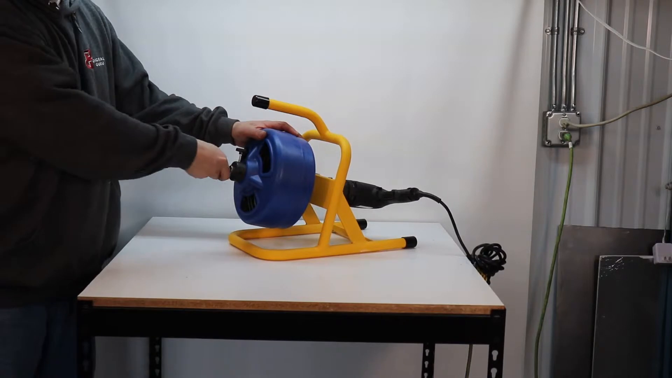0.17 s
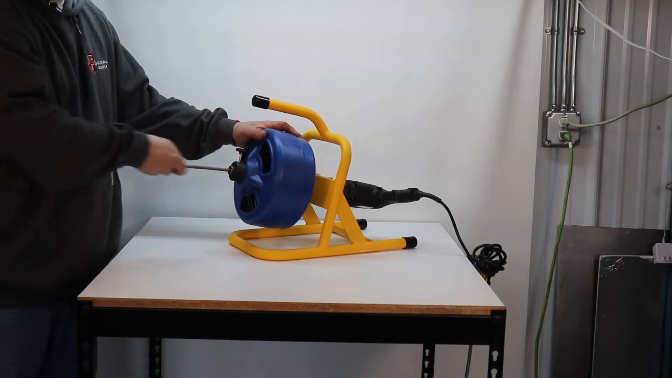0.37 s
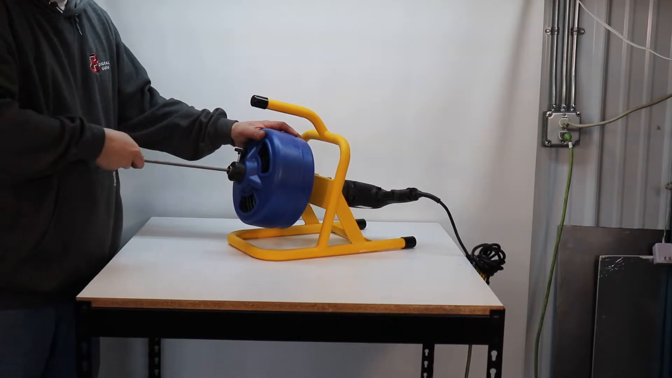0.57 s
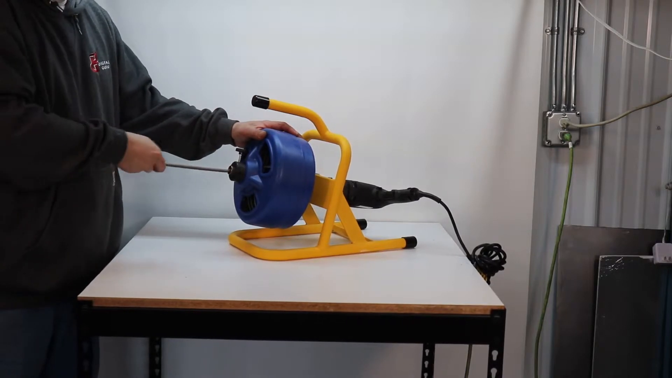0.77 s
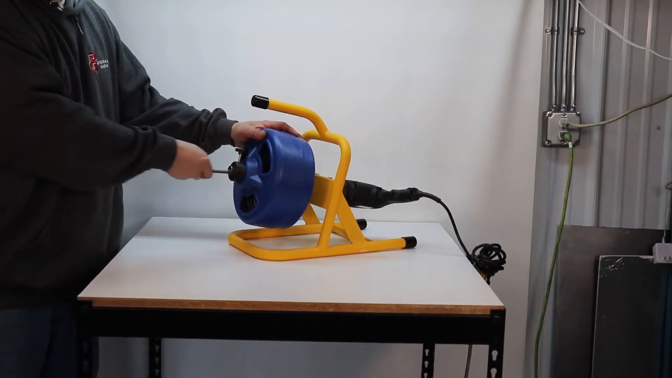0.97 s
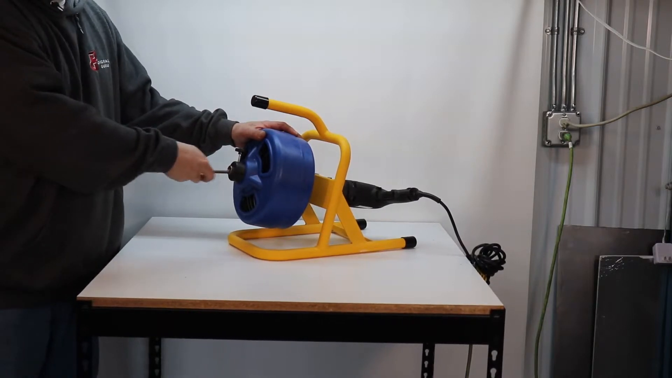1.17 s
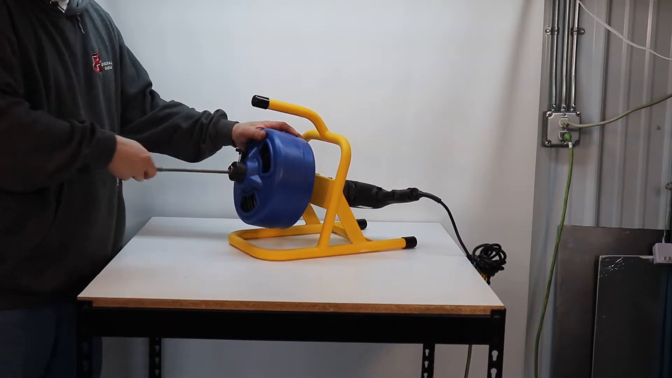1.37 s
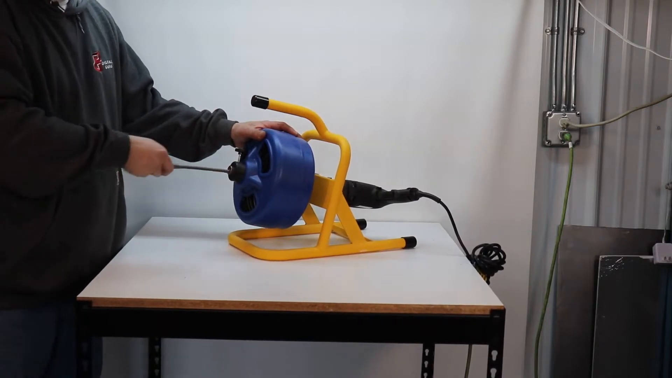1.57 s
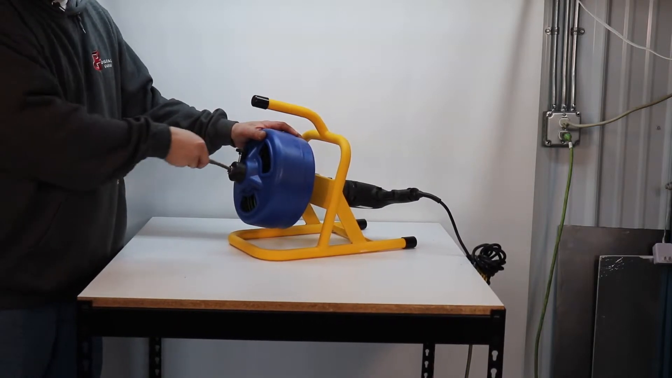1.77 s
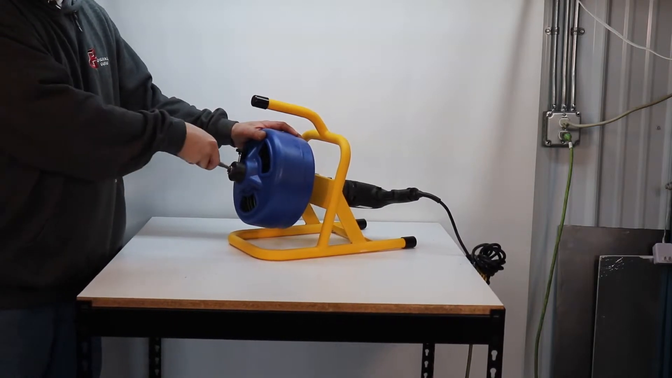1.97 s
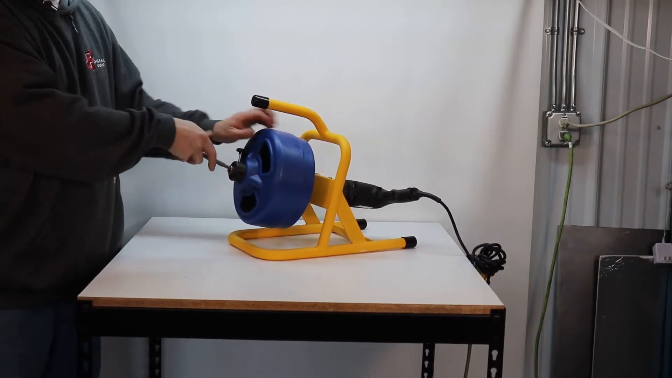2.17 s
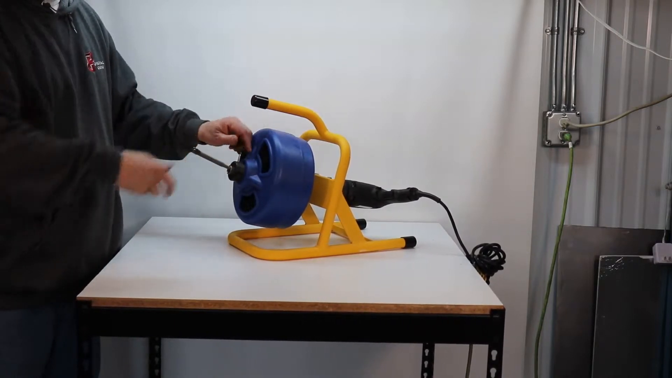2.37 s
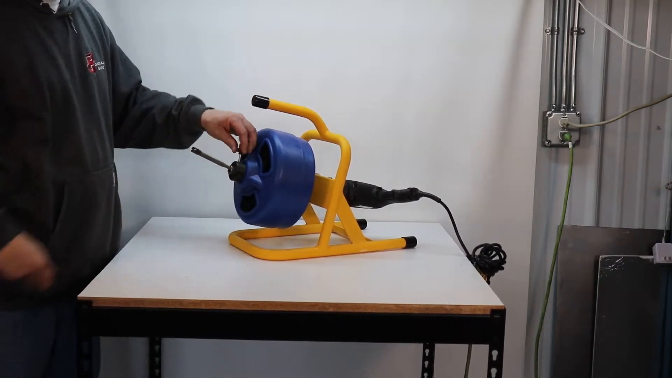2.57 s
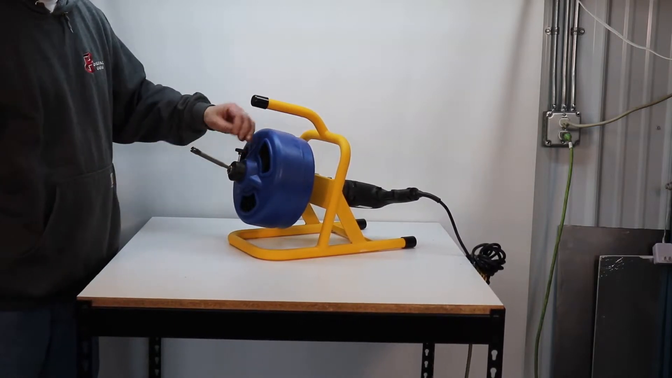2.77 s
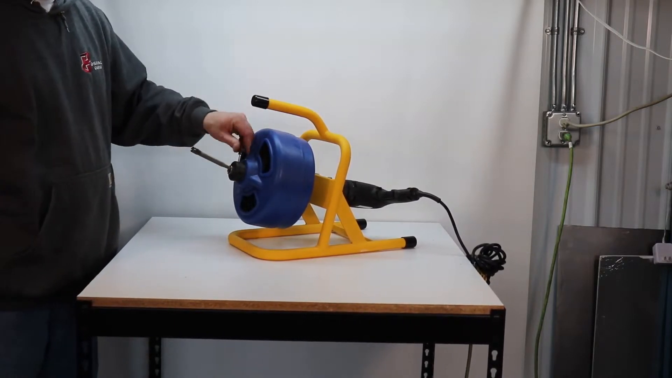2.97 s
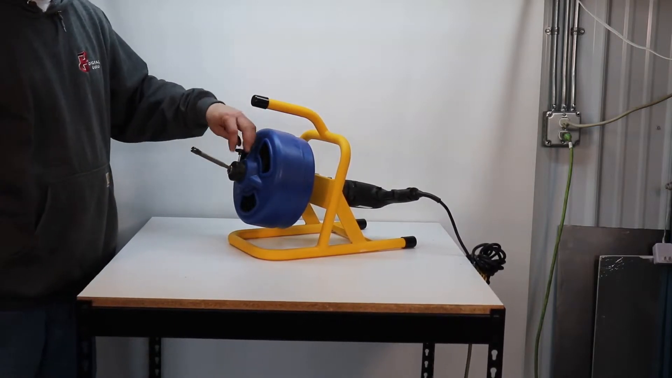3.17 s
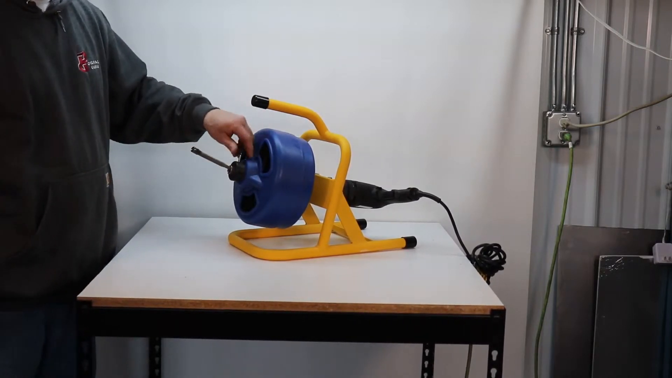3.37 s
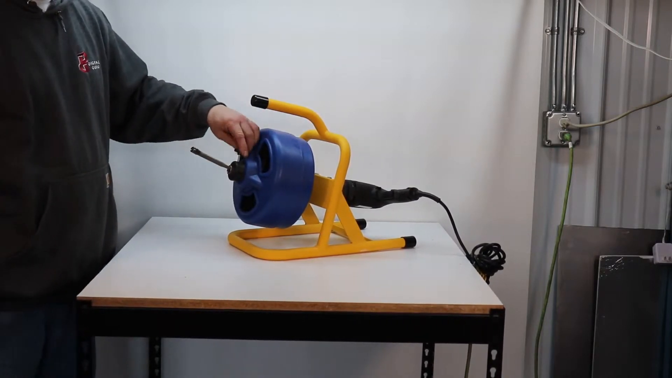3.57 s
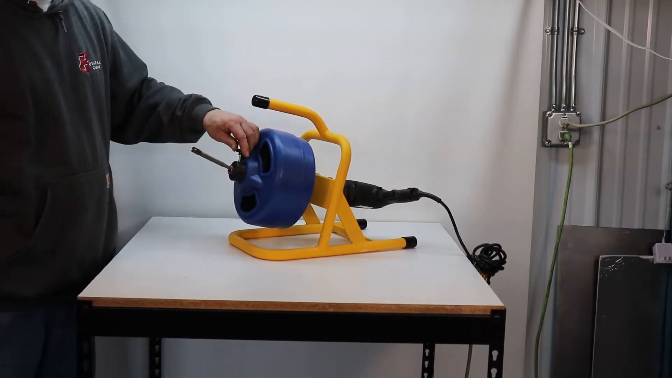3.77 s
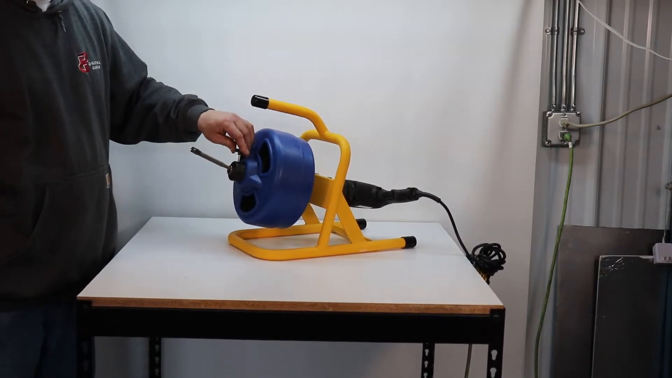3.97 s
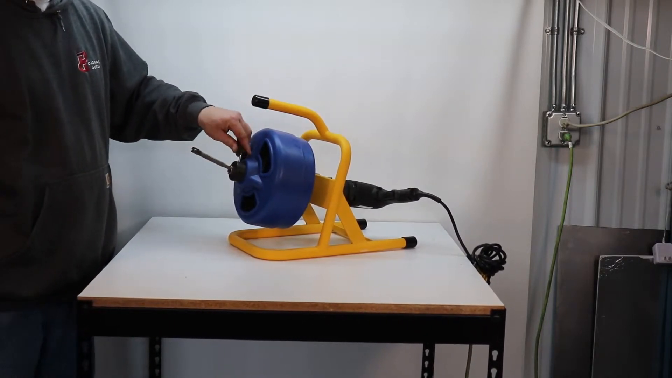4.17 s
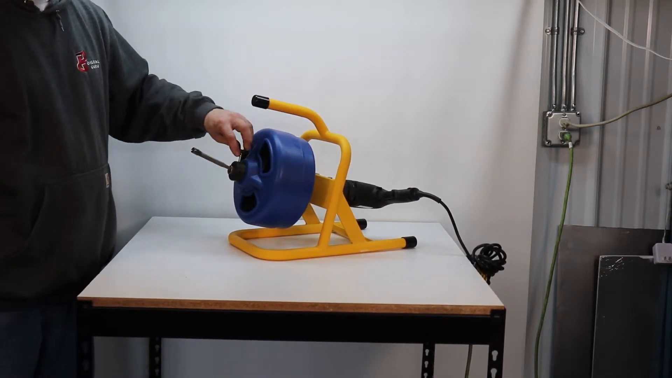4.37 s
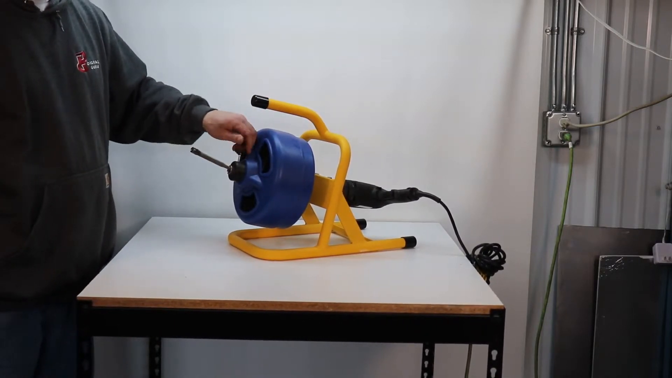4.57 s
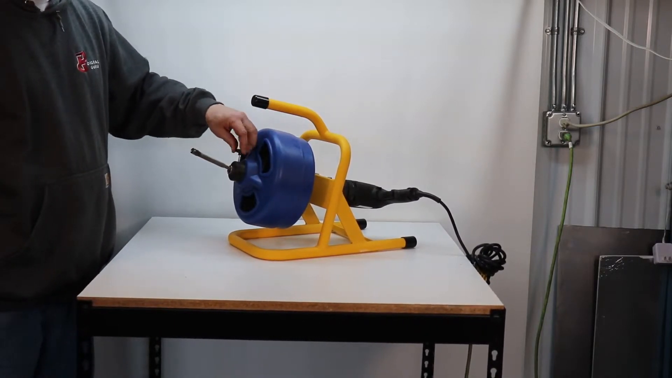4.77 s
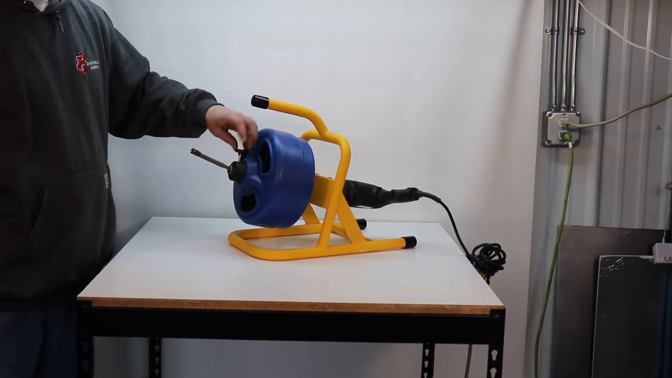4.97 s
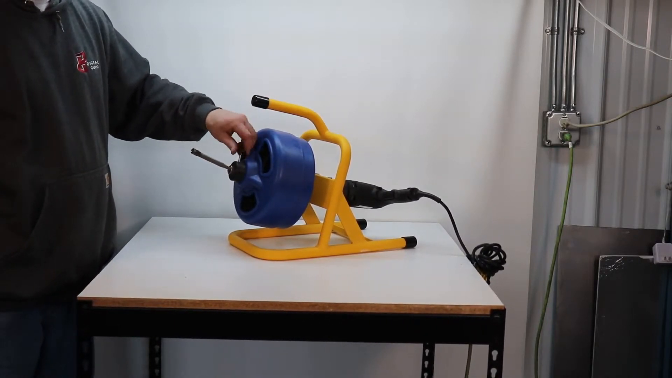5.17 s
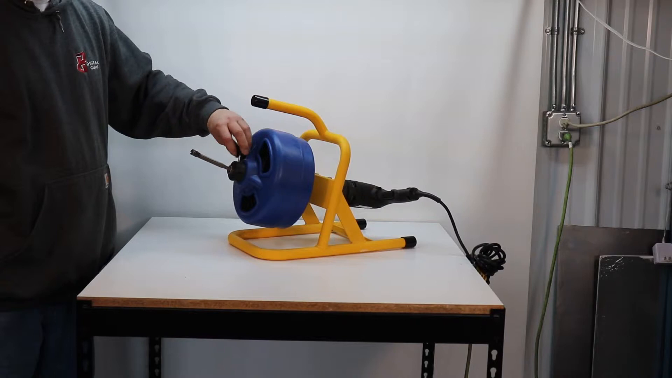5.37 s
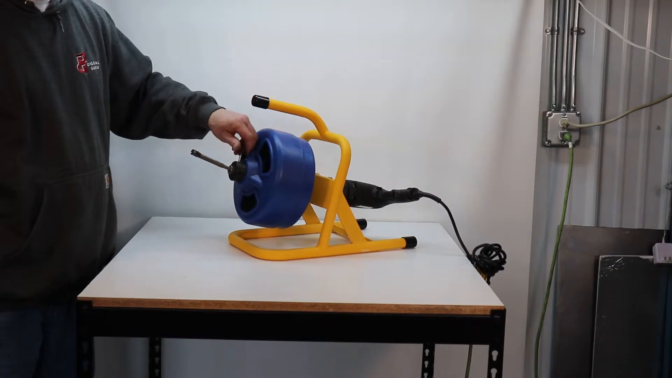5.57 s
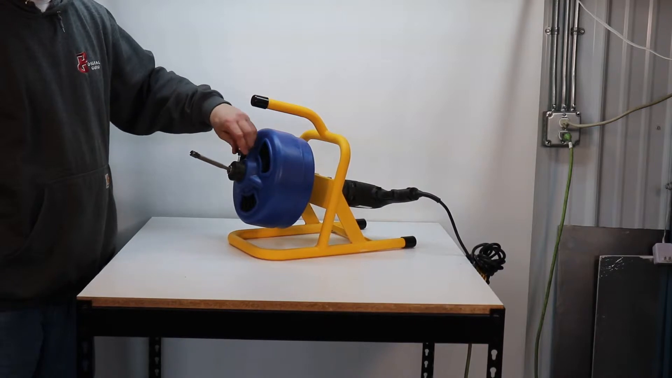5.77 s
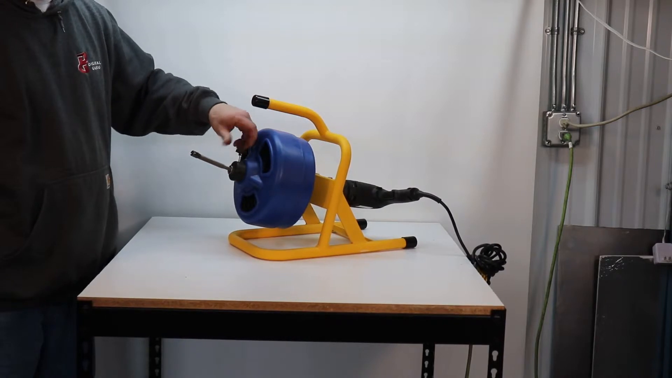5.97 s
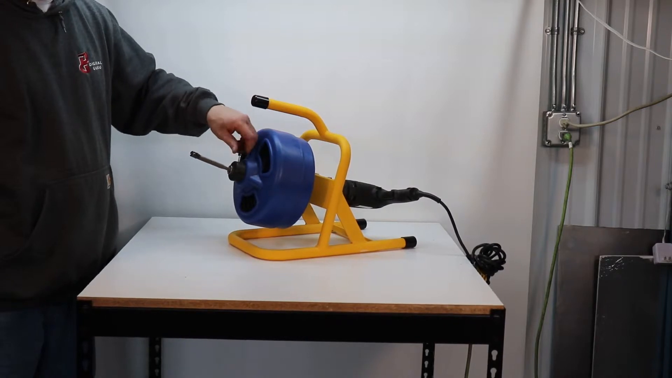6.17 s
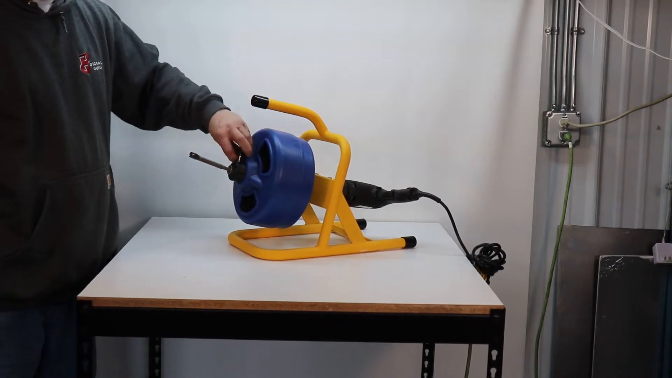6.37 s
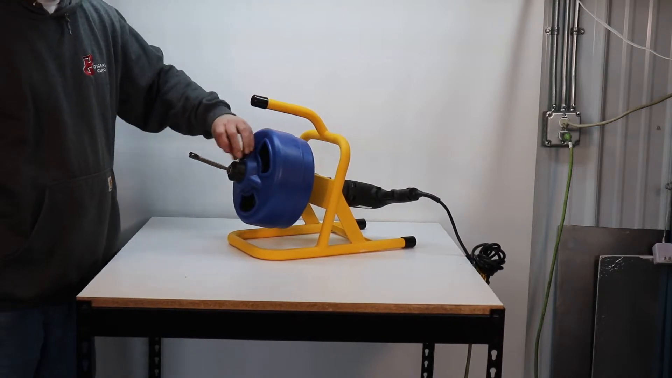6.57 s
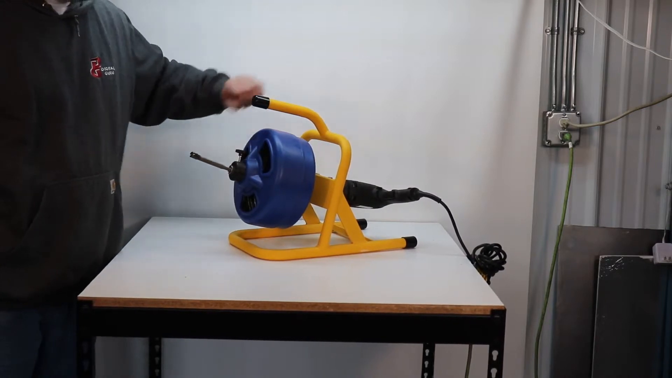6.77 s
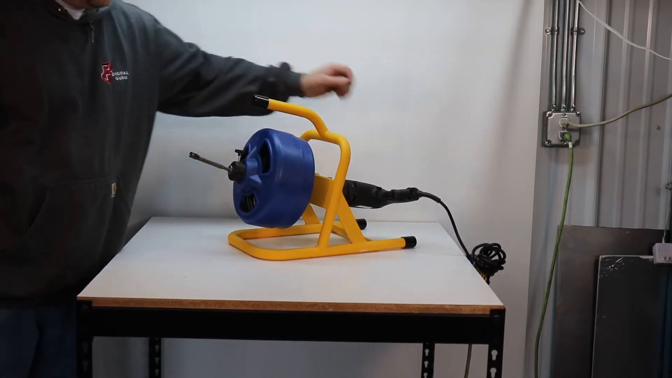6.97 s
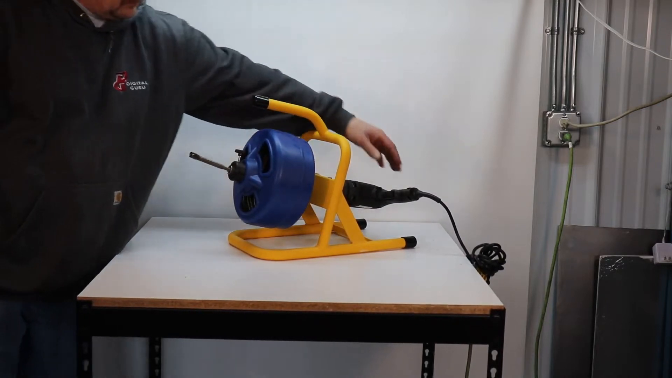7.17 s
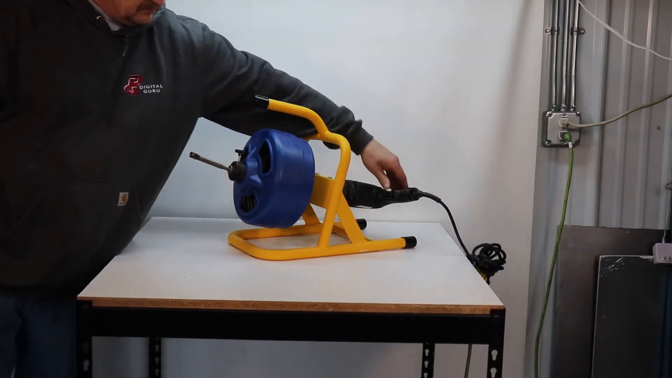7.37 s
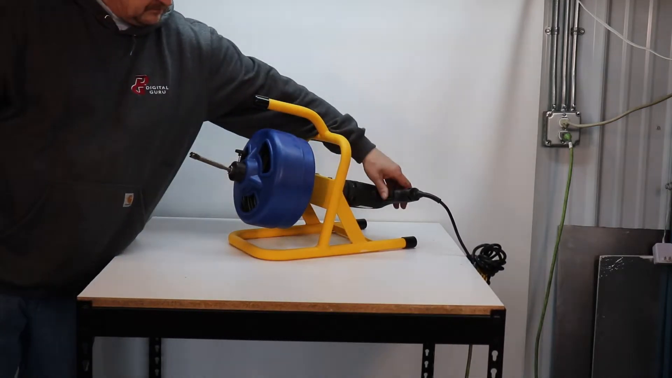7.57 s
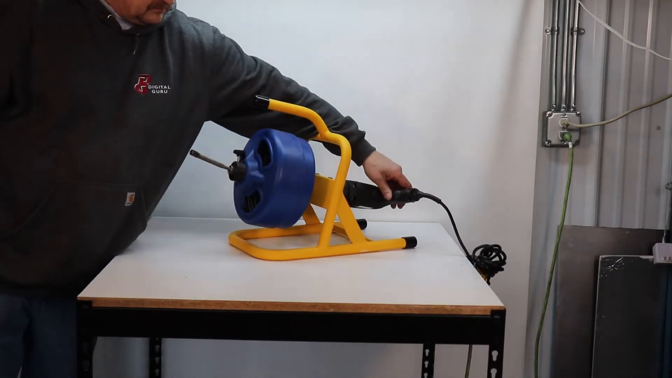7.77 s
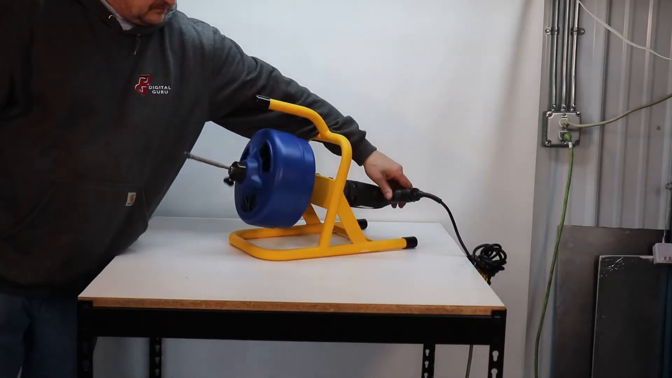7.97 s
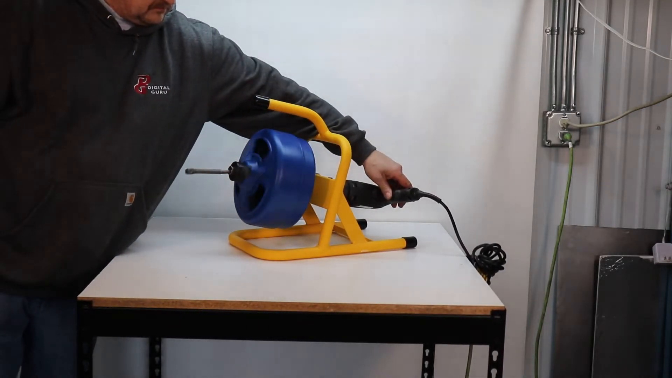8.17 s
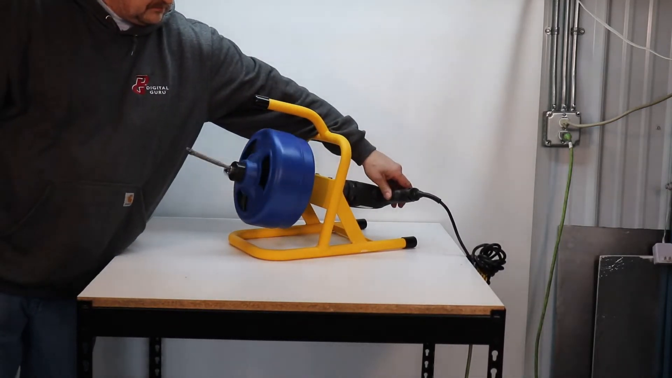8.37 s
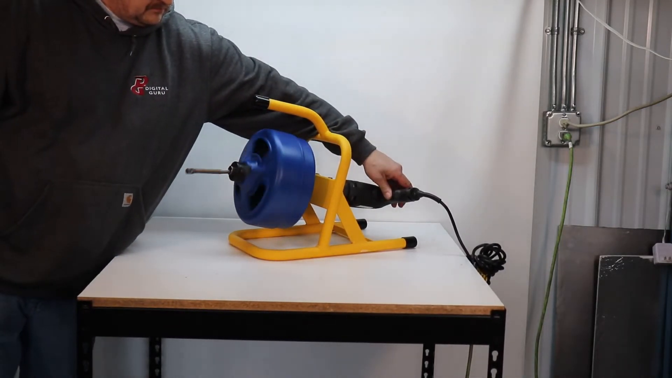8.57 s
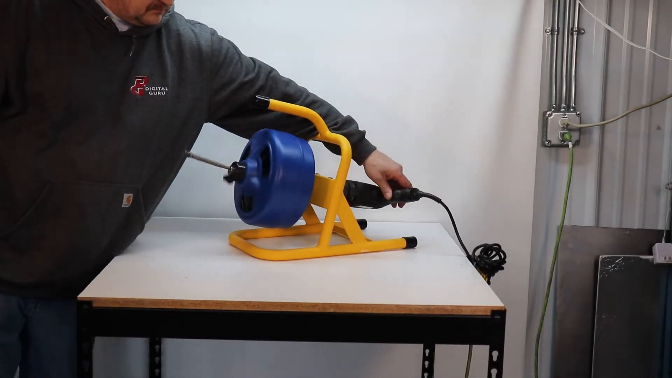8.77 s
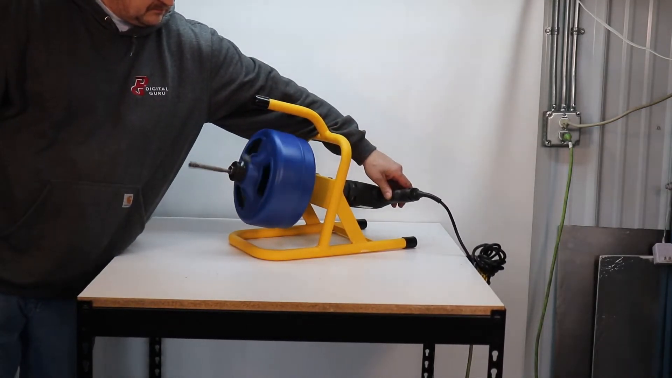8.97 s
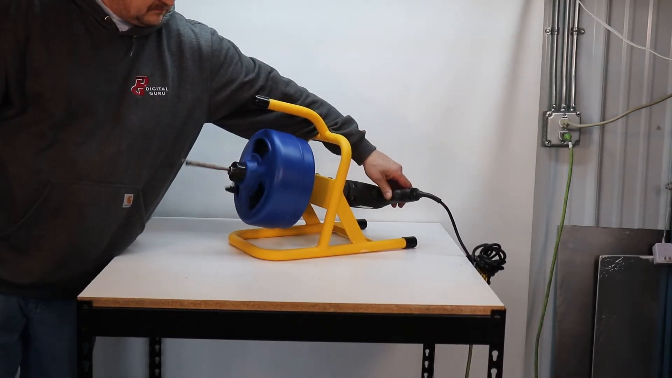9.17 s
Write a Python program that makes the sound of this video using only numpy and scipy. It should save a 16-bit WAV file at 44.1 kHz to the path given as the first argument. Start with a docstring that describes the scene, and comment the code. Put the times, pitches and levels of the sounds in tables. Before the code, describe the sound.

A hard-walled workshop with low hum and soft hiss, heard in close stereo. From 0 to 0.25 s a steel coil cable zips out of a plastic drum, its buzzing rasp falling in pitch. After a short gap, a second pull from 0.7 to 1.15 s speeds up and slows; a third at 1.5 s begins with a sharp catch, running into a short, lower, knocking stroke from 1.9 to 2.1 s. The bright scraping and hollow drum ring echo away. From 2.6 to 6.7 s a thumbscrew makes sparse quiet ticks, tiny dry squeaks and faint wire chafes. Around 7.35 s a sleeve brushes softly; small clicks come at 7.5 and 7.7 s. At 7.76 s a geared motor jolts on with a grinding surge, then its whine climbs until about 8.6 s and holds, wavering, while cable slaps and uneven rattles hit the drum to the end, past 9 s.

```python
"""Drain cleaner: cable pull, thumbscrew, motor start

A hand pulls a coiled steel cable out of a plastic drum in four strokes: coil impulses ring the drum, noise rasps.
A thumbscrew ticks and squeaks (noise bursts through resonances), a sleeve brushes by (noise swell), a trigger clicks.
A geared motor runs up (gear-tooth overtones over noise) while the cable slaps the drum. A hard workshop answers
(decaying noise as echo) over steady hum and hiss; two microphone ports hear it in stereo.
"""
import sys
import numpy as np
from scipy import signal
from scipy.fft import rfft, irfft, next_fast_len
from scipy.io import wavfile
from scipy.ndimage import uniform_filter1d, map_coordinates

SR = 44100
rng = np.random.default_rng(int(sys.argv[2]) if len(sys.argv) > 2 else 0)


def pcm_store(signal):
    """Save signal as 16-bit PCM."""
    levels = np.round(np.clip(np.atleast_2d(signal), -1, 1) * 32767)
    wavfile.write(sys.argv[1], SR, levels.astype(np.int16).T)


N = 406602

# All levels are relative; the functions add offsets.
# Hum and hiss spectrum: freq_hz, density_db
AIR_SPECTRUM = [(20, 1.5), (90, -7.5), (123, -3), (160, -8), (500, -11.5), (1140, -16), (4000, -22.5),
                (10000, -28.5), (15800, -37)]
# Left-right likeness of the air: freq_hz, likeness [0-1]
AIR_LIKENESS = [(60, 0.89), (130, 0.69), (1400, 0.15), (3100, 0.074)]
# Pull strokes, coils passing the guide: time_s, coil_rate_hz, pull_db
STROKES = [
    [(0, 207, -13.5), (.08, 235.9, -15.5), (.118, 205.3, -15.5), (.18, 152.1, -16), (.24, 106.2, -16.5)],
    [(.682, 54.97, -13.5), (.75, 105.4, -12), (.81, 150.3, -12), (.876, 223.3, -15), (.914, 249.5, -17),
     (.955, 244.8, -17.5), (1.0, 209.4, -17.5), (1.1, 116.4, -14), (1.14, 106.5, -22.5)],
    [(1.516, 77.84, -17), (1.59, 131.6, -12.5), (1.664, 203.3, -16.5), (1.71, 214.4, -15),
     (1.745, 199.6, -16), (1.785, 132.2, -17), (1.86, 105.5, -20.5)],
    [(1.875, 98.8, -14.5), (1.9, 120.3, -28), (1.915, 109.9, -14.5), (2.0, 124.8, -14.5),
     (2.03, 129.7, -23.5), (2.11, 100.1, -50)],
]
# Drum resonances: freq_hz, width_hz, gain_db
DRUM_MODES = [(116, 23, -0.5), (238, 56, -3), (495, 53.4, 5), (628, 40, -11), (890, 70, -6)]
# Wire rasp spectrum: freq_hz, density_db
STEEL_SPECTRUM = [(530, -11.5), (900, -3), (978, -8), (1470, -3), (1800, -11), (2510, -10), (3300, -9.5),
                  (4660, -10), (6900, -13.5), (7860, -7.5), (9290, -18), (10600, -19), (15500, -40)]
# Loose coils ringing along: freq_hz, width_hz, gain_db
COIL_MODES = [(2470, 920, -1.5), (3900, 54, 8), (4490, 35, 3), (5094, 36, 14), (6300, 100, -3),
              (7600, 30, -0.5)]
# Cable catches: start_s, level_db, drum_over_level_db
SNAGS = [(0.6064, -28, 2.5), (0.6812, -21, -24), (0.056, -8, -25), (0.879, -13, -33), (1.513, -1.5, -24),
         (1.8744, -9.5, -8), (1.9066, 4, -20)]
# Workshop decay: freq_hz, t60_s
ROOM_T60 = [(90, 1), (300, 1.11), (1500, 1.57), (4000, 1.48), (8000, 1.13), (11000, 0.61), (15000, 0.37)]
# Workshop answer strength: freq_hz, level_db
ROOM_LEVEL = [(100, -.5), (500, -6.5), (2000, -1.5), (10000, -5)]
# Left-right likeness of the answer: freq_hz, likeness [0-1]
ROOM_LIKENESS = [(100, 0.98), (300, 0.96), (700, 0.85), (1500, 0.098), (4000, 0)]
# Thumbscrew, finger and trigger ticks: start_s, level_db, colour_hz, snap_over_level_db
TICKS = [(2.628, -32.5, 1498, -22), (2.721, -41, 1516, -17), (2.943, -35, 1280, -19),
         (2.955, -34.5, 1010, -25), (2.98, -38, 960, -22), (3.012, -35, 1500, -23), (3.037, -37, 1640, -23),
         (3.258, -41.5, 4070, 17), (3.391, -31, 1000, -4), (4.298, -35.5, 1590, -4),
         (4.547, -36.5, 860, -16), (4.618, -36, 2600, -3), (5.171, -37, 960, -21), (5.28, -40.5, 1020, -20),
         (5.325, -43, 2220, -13), (5.717, -36.5, 2170, -5), (5.838, -40, 840, -14), (6.343, -36, 1700, -7),
         (6.403, -39, 1120, -10), (6.423, -39, 970, -7), (6.549, -43.5, 1040, -10), (7.47, -36.5, 1640, 2),
         (7.709, -37, 4250, 15), (7.753, -35, 5200, 2)]
# Thread rubs: start_s, level_db, pitch_hz, decay_s
SQUEAKS = [(3.793, -50, 1690, 0.028), (4.207, -47, 1390, 0.026), (4.418, -52.5, 1700, 0.056),
           (5.497, -54, 1690, 0.039), (5.674, -50, 1746, 0.027), (5.861, -48, 1450, 0.014),
           (5.947, -48, 1390, 0.018), (6.15, -49.5, 1774, 0.056), (6.696, -51, 1400, 0.018)]
# Screw chafing the wire: start_s, level_db, decay_s
CHAFES = [(3.222, -60.5, .02), (4.45, -65, .015), (5.844, -59.5, 0.017), (6.379, -60, 0.035),
          (6.543, -56.5, .015)]
# Plastic nose of the drum: freq_hz, width_hz, gain_db
COLLAR_MODES = [(477, 93, 4), (918, 65, 7.5), (1290, 350, -2.5), (2480, 2860, -6), (8140, 620, -15.5)]
# Chafed wire resonances: freq_hz, width_hz, gain_db
WIRE_MODES = [(4900, 360, 3), (7850, 500, 2.5)]
# Sleeve cloth spectrum: freq_hz, density_db
CLOTH_SPECTRUM = [(290, -48), (500, -19), (629, -10.5), (1430, -7), (1750, -3), (2010, -6), (8360, -14.5),
                  (15500, -30)]
# Motor noise, surging then settling: time_s, level_db
MOTOR_LEVEL = [
    [(7.763, -34), (7.81, -26.5), (7.88, -21), (7.93, -22), (8.0, -27), (8.4, -28), (9.22, -29)],
]
# Motor housing resonances: freq_hz, width_hz, gain_db
HOUSING_MODES = [(480, 93, -21), (874, 186, -9.5), (1286, 210, -9.5), (1723, 81, -1), (2083, 66, 3.5),
                 (2357, 81, 0.5), (2693, 66, -9.5), (3410, 505, 1), (3570, 295, 3.5), (3920, 150, -9),
                 (4460, 410, -3.5), (4600, 2500, -10.5)]
# Brush and fan spectrum: freq_hz, density_db
WHIRR_SPECTRUM = [(70, -96), (330, -25), (800, -11), (2000, -11), (3500, -9), (6500, -17), (12500, -30),
                  (14700, -34), (15500, -34)]
# Cable loading the drum: start_s, level_db, length_s, rattle_over_level_db, tooth_rate_hz
LOADS = [(7.982, -27, 0.048, -6, 336), (8.07, -23, 0.04, -34, 390.8), (8.132, -19, 0.039, -42, 422.7),
         (8.215, -17.5, 0.025, -16, 454.2), (8.264, -20.5, 0.073, -13, 464),
         (8.417, -19.5, 0.026, 0.5, 501.5), (8.462, -18.5, 0.028, -3, 514.3),
         (8.535, -23.5, 0.014, -9, 514.3), (8.627, -14.5, 0.014, 0.5, 542.2),
         (8.653, -18.5, 0.028, -32, 523.8), (8.695, -21, 0.019, -11, 528), (8.849, -15, 0.013, 2.5, 564.3),
         (8.872, -15, 0.013, -6.5, 550.3), (8.931, -38, 0.015, -14, 531), (9.023, -18.5, 0.028, 0, 563.6),
         (9.063, -17, 0.031, -36, 551), (9.153, -45, 0.043, 18, 566.5)]

AIR_DB = -50.5
BRISK_HZ = 220  # reference coil rate
RASP_DB_PER_OCTAVE, KNOCK_DB = 5.5, -6.5  # faster coils rasp more; knock on the drum
COIL_DB = -8  # coil ring relative to the slide
SCATTER_DB, SCATTER_T60_S = 1, 0.03
BRUSH_S, BRUSH_DB, BRUSH_RISE_S, BRUSH_FALL_S = 7.36, -39, 0.07, 0.075  # loudest moment, level, swell widths
START_S, START_HZ = 7.762, 146  # motor start, first tooth rate
STEP_S, CREEP_PER_S, EASY_HZ = .02, 2.5, 480  # step between loads, creep, easy tooth rate
TOP_HZ = 15880  # microphone band limit


def amp(db):
    """Amplitude factor of a level in dB."""
    return 10 ** (np.asarray(db) / 20)


def unit(x):
    """x scaled to rms 1."""
    return x / np.sqrt(np.mean(x ** 2) + 1e-20)


def along(points, hz):
    """Interpolate (freq_hz, value) points on a log frequency axis."""
    f, v = np.transpose(points)
    return np.interp(np.log(hz + 1), np.log(f + 1), v)


def curves(tables):
    """A gate near 1 inside each table's span, and each column per sample."""
    t = np.arange(N) / SR
    gate = sum((t >= rows[0][0]) & (t <= rows[-1][0]) for rows in tables)
    s, *cols = np.concatenate(tables).T
    return uniform_filter1d(gate * 1., size=64), [np.interp(t, s, c) for c in cols]


def filtered(x, response):
    """Filter x by a complex response of frequency."""
    m = next_fast_len(x.shape[-1] + SR // 2)
    return irfft(rfft(x, m) * response(np.fft.rfftfreq(m, 1 / SR)), m)[..., :x.shape[-1]]


def modes(table):
    """Causal response of a body's resonances, alternating in sign."""
    def response(f):
        total = 0
        for k, (c, w, db) in enumerate(table):
            total = total + (-1) ** k * amp(db) * 1j * f * w / (c * c - f * f + 1j * f * w)
        return total
    return response


def noise(spectrum, grain_db=0):
    """Coloured noise of rms 1, in 32-sample grains of uneven size."""
    grains = np.repeat(rng.standard_normal(N // 32 + 1), 32)[:N]
    grainy = amp(grain_db * grains) * rng.standard_normal(N)
    return unit(filtered(grainy, lambda hz: amp(along(spectrum, hz))))


def wobble(rate_hz, count=1):
    """Smooth random curves, rate_hz knots a second."""
    knots = rng.standard_normal((count, int(N * rate_hz / SR) + 4))
    return np.array([map_coordinates(row, [np.arange(N) * rate_hz / SR]) for row in knots])


def pair(two, likeness):
    """Left and right mixed from two unrelated signals, as alike as the table asks."""
    def turn(hz):
        return np.arccos(np.clip(along(likeness, hz), -1, 1)) / 2
    mid, side = filtered(two, lambda hz: np.array([np.cos(turn(hz)), np.sin(turn(hz))]))
    return np.array([mid + side, mid - side])


def placed(x, pan_db, lag_samples):
    """Left minus right level is pan_db; left arrives lag_samples after right."""
    side = np.array([[1], [-1]])
    return filtered(x, lambda hz: amp(side * pan_db / 2) * np.exp(-1j * np.pi * side * lag_samples * hz / SR))


def workshop_air():
    """Workshop hum and microphone hiss: coloured noise, both ports drifting slowly together in level."""
    two = np.array([noise(AIR_SPECTRUM), noise(AIR_SPECTRUM)])
    return amp(AIR_DB) * pair(two, AIR_LIKENESS) * amp(.6 * wobble(1.5))


def pulses(rate_hz, jitter, scatter_db):
    """One impulse a cycle, uneven in time and size, and the phase in cycles."""
    phase = np.cumsum(rate_hz) / SR
    count = np.arange(1, int(phase[-1]))
    luck = rng.standard_normal((len(count), 2))
    at = np.clip(np.interp(count + jitter * luck[:, 0], phase, np.arange(N)), 0, N - 2)
    size = amp(scatter_db * luck[:, 1])
    whole, part = at.astype(int), at % 1
    train = np.bincount(whole, size * (1 - part), N) + np.bincount(whole + 1, size * part, N)
    return train * np.sqrt(SR / rate_hz), phase


def cable():
    """Each coil bumps the guide, knocks the drum and scrapes steel on steel."""
    gate, (rate, pull_db) = curves(STROKES)
    knock_db = pull_db + KNOCK_DB
    rasp_db = pull_db + RASP_DB_PER_OCTAVE * np.log2(rate / BRISK_HZ) - 5.5
    bumps, phase = pulses(rate, jitter=.012, scatter_db=.8)
    rumble = rng.standard_normal(N)
    drag = .07 * (BRISK_HZ / rate) ** 2.2 * rumble  # slow coils drag unevenly
    drive = gate * amp(knock_db) * (bumps + drag)

    # the faster the pull, the clearer the guide hums at the coil rate
    order = np.arange(1, 6)[:, None]
    overtones = (-1) ** order * np.cos(2 * np.pi * order * phase) / order ** .6
    hum = (rate / BRISK_HZ) ** 1.5 * np.sum(overtones, axis=0)

    click = unit(filtered(bumps, lambda hz: amp(along(STEEL_SPECTRUM, hz))))
    slide = unit(.7 + np.exp(-3 * (phase % 1))) * noise(STEEL_SPECTRUM, grain_db=1.5)
    coil_ring = unit(filtered(slide, modes(COIL_MODES)))
    slide = unit(slide + amp(COIL_DB) * coil_ring)
    scrape = (slide + .25 * click) * amp(.9 * wobble(35)[0])
    rasp = gate * (amp(rasp_db) * scrape + amp(knock_db - 9) * hum)

    t = np.arange(SR // 20) / SR
    for start_s, db, drum_db in SNAGS:
        k = round(start_s * SR)
        rasp[k:k + len(t)] += amp(db - 16 - 60 * t / 0.0071) * slide[k:k + len(t)]
        drive[k:k + len(t)] += amp(db + drum_db - 1.5 - 60 * t / 0.11) * rumble[k:k + len(t)]
    drum = amp(13) * filtered(drive, modes(DRUM_MODES))
    return filtered(rasp + drum, lambda hz: 1 / (1 + (80 / (hz + 1)) ** 4))


def scatter(x):
    """Early scatter off table and wall: a brief spray of treble echoes, different at each port."""
    t = np.arange(SR // 20) / SR
    spray = np.diff(rng.standard_normal((2, len(t) + 1))) * amp(-60 * t / SCATTER_T60_S)
    spray = spray / np.linalg.norm(spray[0])
    delayed = np.pad(x, (40, 0))[None]
    return amp(SCATTER_DB) * signal.fftconvolve(delayed, spray, axes=1)[:, :N]


def room(x):
    """Workshop answer: noise whose every frequency dies at its own speed."""
    hz, t, z = signal.stft(rng.standard_normal((2, SR * 3 // 2)), SR, nperseg=256)
    t60_s = along(ROOM_T60, hz)[:, None]
    decay = amp(along(ROOM_LEVEL, hz)[:, None] - 60 * t / t60_s)
    tail = signal.istft(z * decay / np.sqrt(t60_s * SR / 14), SR, nperseg=256)[1]
    delayed = np.pad(x, (300, 0))[None]
    return signal.fftconvolve(delayed, pair(tail, ROOM_LIKENESS), axes=1)[:, :N]


def thumbscrew():
    """Ticks scuff and snap, squeaks rub narrow rings, both knock the collar; chafes ring the wire."""
    out, knocks, chafe = np.zeros(N), np.zeros(N), np.zeros(N)
    t = np.arange(SR // 5) / SR
    for start_s, db, colour_hz, snap_db in TICKS:
        k = round(start_s * SR)
        scuff, snap = rng.standard_normal((2, len(t)))
        scuff = amp(db - 60 * t / 0.19) * (1 - np.exp(-t / 0.00014)) * scuff
        snap = amp(db + snap_db - 5 - 60 * t / 0.059) * (1 - np.exp(-t / 0.00024)) * snap
        out[k:k + len(t)] += filtered(scuff, modes([(colour_hz, 0.14 * colour_hz, 5)]))
        out[k:k + len(t)] += filtered(snap, modes([(6100, 4400, 0.00094)]))
        knocks[k:k + len(t)] += amp(1) * scuff
    for start_s, db, pitch_hz, decay_s in SQUEAKS:
        k = round(start_s * SR)
        rub = np.exp(-t / decay_s) * (1 - np.exp(-t / 0.00091)) * rng.standard_normal(len(t))
        rub[0] += 14  # a sharp first slip
        out[k:k + len(t)] += amp(db + 19.5) * filtered(rub, modes([(pitch_hz, 70, 2.5)]))
        knocks[k] += amp(db + 29)  # the thread breaks loose
    for start_s, db, decay_s in CHAFES:
        k = round(start_s * SR)
        swell = np.exp(-t / decay_s) * (1 - np.exp(-t / .003))
        chafe[k:k + len(t)] += amp(db + 18) * swell * rng.standard_normal(len(t))
    return out + filtered(knocks, modes(COLLAR_MODES)) + filtered(chafe, modes(WIRE_MODES))


def sleeve():
    """Cloth slides over the painted tube: grainy noise in one swell."""
    t = np.arange(N) / SR - BRUSH_S
    swell = np.exp(-(t / np.where(t < 0, BRUSH_RISE_S, BRUSH_FALL_S)) ** 2)
    return amp(BRUSH_DB) * swell * noise(CLOTH_SPECTRUM, grain_db=0.5)


def gear_rate(t):
    """Tooth rate in Hz: even run-up to the first load, a step into each next one, upward creep below EASY_HZ."""
    start_s, hz = np.array(LOADS)[:, [0, -1]].T
    end_s = np.append(start_s[1:] - np.minimum(STEP_S, np.diff(start_s) / 2), N / SR)
    crept_hz = hz + CREEP_PER_S * np.maximum(EASY_HZ - hz, 0) * (end_s - start_s)
    knots_s = np.append(START_S, np.ravel([start_s, end_s], "F"))
    knots_hz = np.append(START_HZ, np.ravel([hz, crept_hz], "F"))
    return np.interp(t, knots_s, knots_hz)


def motor():
    """Gear teeth ring the housing over the whirr; cable loads make them sing and the drum rattle."""
    gate, (whirr_db,) = curves(MOTOR_LEVEL)
    t = np.arange(N) / SR
    rate = gear_rate(t)
    bite, rattle = amp(whirr_db - .5), 0
    for start_s, db, length_s, rattle_db, _ in LOADS:
        since, over = np.maximum(t - start_s, 0), np.maximum(t - start_s - length_s, 0)
        hold = np.exp(np.minimum(t - start_s, 0) / 0.0073 - over / 0.0023 - since / 0.24)
        bite = bite + amp(db - 2) * hold
        rattle = rattle + amp(db + rattle_db - 9) * hold

    phase = np.cumsum(rate * (1 + .003 * wobble(80)[0])) / SR
    order = np.arange(1, 22)[:, None]
    # every overtone swells by itself as the tooth contact wanders
    size = np.abs(modes(HOUSING_MODES)(order * rate)) / (1 + (order * rate / 5800) ** 4)
    size = size * amp(3 * wobble(40, count=21))
    teeth = np.sum(size * np.sin(2 * np.pi * order * phase + order ** 2 / 3), axis=0)

    # slow teeth grind in the housing, the fan rises with speed
    speed = np.clip(rate / EASY_HZ, 0, 1)
    grit = np.exp(-1.5 * (phase % 1)) * rng.standard_normal(N)
    grind = unit(filtered(grit, lambda hz: modes(HOUSING_MODES)(hz) / (1 + (hz / 5800) ** 4)))
    whirr = speed ** 0.4 * noise(WHIRR_SPECTRUM) + 0.5 * grind / speed ** 0.3
    whirr = whirr * amp(wobble(45)[0])

    jerk = amp(-21.5) * np.exp(-((t - START_S - .06) / 0.052) ** 2)  # the drum is jolted into motion
    thump = filtered(gate * (rattle + jerk) * rng.standard_normal(N), modes([(142, 106, -3.5)]))
    running = gate * (bite * teeth + (amp(whirr_db) + rattle) * whirr)
    return filtered(running + amp(9.5) * thump, lambda hz: hz > 70)


def scene():
    """Sum the placed sources, their scatter and room answer, and the air."""
    hands, cloth, drill = cable() + thumbscrew(), sleeve(), motor()
    near = placed(hands, pan_db=-0.9, lag_samples=-0.78)
    near = near + placed(cloth, pan_db=-0.3, lag_samples=-1.7)
    near = near + placed(drill, pan_db=-1.5, lag_samples=0.47)
    far = room(hands + cloth) + amp([[-4.5], [-2]]) * room(drill)
    return near + scatter(hands + cloth + drill) + far + workshop_air()


def record(dry):
    """The microphone thins the deep bass and passes nothing from TOP_HZ up."""
    return filtered(dry, lambda hz: (hz < TOP_HZ) * hz ** 2 / (hz ** 2 + 40 ** 2))


dry = scene()
out = record(dry)
pcm_store(out)
```